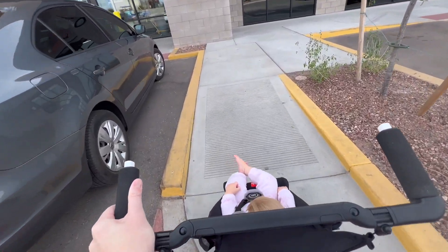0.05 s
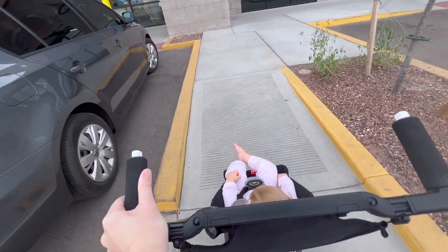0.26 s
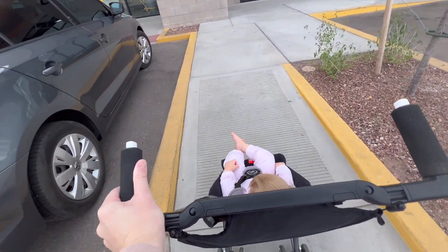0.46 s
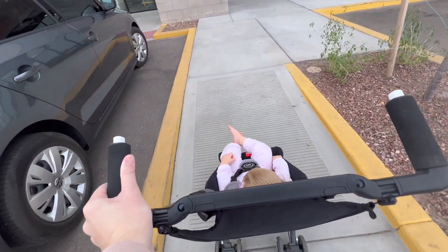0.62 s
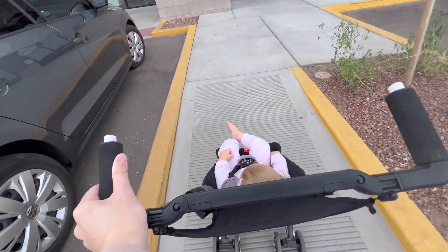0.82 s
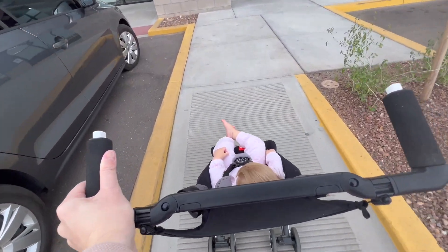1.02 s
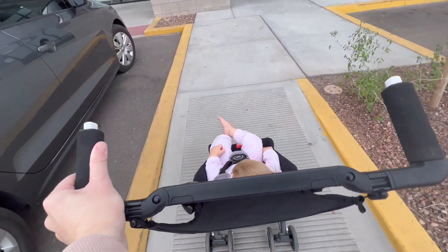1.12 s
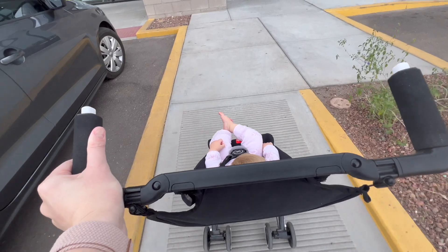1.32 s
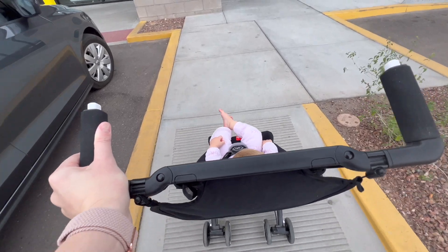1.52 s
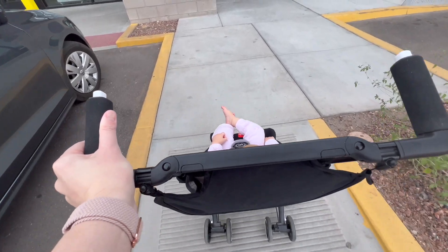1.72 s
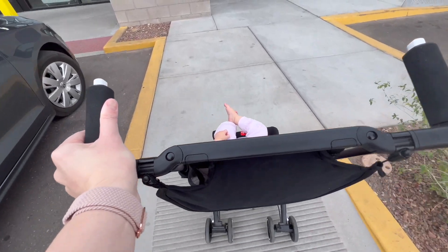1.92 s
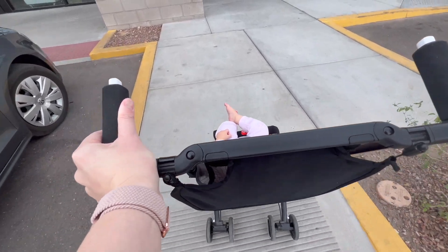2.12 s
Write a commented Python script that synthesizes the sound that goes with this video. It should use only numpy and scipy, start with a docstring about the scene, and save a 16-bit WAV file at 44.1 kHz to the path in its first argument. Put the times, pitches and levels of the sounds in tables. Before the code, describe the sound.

Hard stroller wheels roll onto a grooved concrete ramp, crunching, clicking and rattling outdoors.

```python
"""Stroller on a grooved curb ramp

Outdoors, heard from the handle: hard wheels crunch over grit and tick across concrete grooves.
Coloured noise and random impacts make the rolling, scuffs and frame drone; decaying sines make
the thumps, frame clacks, fitting rattle and loose-wheel chatter. A low noise rumble, probably air
buffeting the microphone ports, falls away from about 1.3 s and swells again at the end.
Distant traffic is a steady noise wash."""
import sys
import numpy as np
from scipy.fft import rfft, irfft, next_fast_len
from scipy.io import wavfile
from scipy.ndimage import uniform_filter1d, map_coordinates

SR = 44100
rng = np.random.default_rng(int(sys.argv[2]) if len(sys.argv) > 2 else 0)


def store_wav(level_fs):
    """Save 16-bit WAV to argv[1]."""
    pcm = np.round(np.clip(np.atleast_2d(level_fs), -1, 1) * 32767)
    wavfile.write(sys.argv[1], SR, pcm.T.astype(np.int16))


N = 95079

# Rolling crunch. Each row: time in seconds, level in dB before the groove pulse.
CRUNCH_LEVEL = [(0, -53), (.17, -49.5), (.24, -44.5), (.3, -57), (.4, -43.5), (.55, -44.5), (.68, -38),
                (.73, -45.5), (.8, -39), (1.48, -38.5), (1.7, -34), (1.8, -36), (1.91, -40.5), (1.99, -35),
                (2.16, -43)]
# Fine sand under the tyres. Each row: time in seconds, level in dB before flicker and groove pulse.
SAND_LEVEL = [(0, -53.5), (.22, -51.5), (.3, -62), (.74, -84), (.8, -52.5), (1.3, -53.5), (1.42, -43),
              (1.62, -42), (1.8, -49), (1.9, -52.5), (2.16, -47.5)]
# Buffeting. Each row: time in seconds, level in dB.
BUFFET_LEVEL = [(0, -32.5), (.09, -26.5), (.15, -32.5), (.85, -30.5), (1.05, -29), (1.28, -29), (1.33, -29),
                (1.49, -40), (1.9, -54.5), (2.16, -41)]
# Noise spectra. Each row: frequency in Hz, relative density in dB per Hz.
BUFFET_COLOUR = [(15, -53), (45, -6), (70, 0.5), (90, -4), (140, -9.5), (400, -34), (900, -94)]
FRAME_COLOUR = [(40, -9.5), (90, 2.5), (260, -0.5), (370, -5), (500, -9.5), (4500, -51)]
CRUNCH_COLOUR = [(200, -13), (700, -2), (2000, -3), (4200, -6.5), (6500, -14.5), (9000, -16), (16000, -119)]
SAND_COLOUR = [(1000, -8), (4000, -0.5), (7000, -7), (9000, 3), (10500, -9), (15500, -3)]
KNOCK_COLOUR = [(150, -4), (700, -2), (3500, 1), (9000, -6), (16000, -16.5)]
# Far traffic around the car park. Each row: frequency in Hz, relative density in dB per Hz.
TRAFFIC_COLOUR = [(550, -11.5), (950, 11.5), (2000, -25), (12000, -48)]
# Grit's drive of the wheel resonances. Each row: frequency in Hz, drive in dB.
GRIT_DRIVE = [(2500, 6.5), (3600, -19), (5500, 2)]
# Wheel and fork, frame joint, loose wheel and small fitting resonances.
# Each row: nominal frequency in Hz, relative level in dB, 60 dB decay time in seconds.
WHEEL_MODES = [(963, -8, 0.017), (1430, -7, .017), (1974, -9, 0.025), (2500, 1, 0.014), (3300, 1, .011),
               (3760, 5, 0.012), (5550, -9, 0.029), (8300, -7, 0.017)]
JOINT_MODES = [(1830, -8, 0.055), (2900, -1, 0.018), (4080, 7, 0.017), (4720, 1, 0.022)]
LOOSE_MODES = [(1310, -17, 0.01), (2440, -3, 0.014)]
FITTING_MODES = [(2260, 2.5, 0.029), (5370, -2, 0.026)]
# Wheel drops into a groove. Each row: start in seconds, level in dB before the group gain,
# brightness in dB per octave.
GROOVES = [(.655, -30, -8.5), (.8572, -26.5, -1), (.9082, -30.5, 11), (.9287, -30, -5.5), (.9994, -26, -2),
           (1.0236, -24, -1), (1.1128, -28, -6), (1.1346, -26.5, -8), (1.1571, -28.5, -6.5),
           (1.1775, -29, -6.5), (1.199, -27.5, -8), (1.2615, -29, -3), (1.2824, -22.5, 0),
           (1.3038, -24.5, -3), (1.346, -30, -4), (1.3882, -28, -2), (1.4093, -24.5, -0.5),
           (1.5134, -30, -3), (1.598, -30.5, -4), (1.6835, -27.5, 0), (1.704, -27.5, 0), (1.944, -30, -4),
           (1.975, -29, 1), (2.0097, -27, -4)]
# Small fitting rattles. Each row: start in seconds, level in dB before the group gain.
RATTLES = [(.3255, -36.5), (.4177, -38.5), (.4681, -50), (.491, -31.5), (.516, -42), (.5623, -45),
           (.6072, -41)]
# Frame joint clacks. Each row: start in seconds, level in dB before the group gain,
# brightness in dB per octave, pitch ratio.
CLACKS = [(.1003, -22, -2.5, 1), (.197, -32, -4.5, 1), (.216, -34, -4, .85), (1.2402, -20.5, -2.5, .81)]
# Loose wheel chatters. Each row: start in seconds, level in dB before the group gain.
CHATTER = [(1.719, -28), (1.7698, -23.5), (1.7903, -21), (1.8135, -21.5), (1.8645, -26.5)]
# Tyre scuffs. Each row: start in seconds, length before release in seconds, level in dB,
# left minus right in dB.
SCUFFS = [(0.029, 0.05, -39.5, 2), (0.186, 0.009, -36.5, -5), (0.627, 0.033, -38.5, 0)]
# Frame thumps on a bump. Each row: start in seconds, level in dB before the envelope, pitch in Hz.
THUMPS = [(0.073, -15, 66), (.296, -19.5, 118.6), (0.954, -24, 106), (1.26, -17.5, 88),
          (1.439, -25.5, 143.6)]
# Microphone pair. Each row: frequency in Hz, left minus right in dB.
PORT_BALANCE = [(60, 3), (400, -2), (750, 4.5), (2000, -2), (2700, 3), (3500, 5), (4100, 1), (5500, 9),
                (7200, 3.5), (8800, -1.5)]

SIDES = np.array([[.5], [-.5]])  # half of a left-right difference goes to each port
LEFT_LEAD_S, TOP_HZ = 0.000532, 16100
ALIKE = .4  # power share common to both ports
GRIT_PER_S, GRIT_SHARE = 920, 0.29  # impact rate; power share of impacts
GRIT_SPREAD_DB = 3.8  # scales the exponential draw of impact size
GROOVE_HZ = 43.65  # nominal grooves per second
SURGE_DB, SURGE_SCATTER_DB, SURGE_DECAY_S = -1, 3.5, 0.0055  # groove burst over a base gain of 1
RING_DB = -4.5  # wheel ring relative to crunch
PATCH_HZ, PATCH_DB = 22, 1.6
SAND_FLICKER_HZ, SAND_FLICKER_DB = 60, 2.4
FRAME_DB, TRAFFIC_DB = -41.5, -56
SCUFF_ATTACK_S, SCUFF_RELEASE_S = 0.0042, 0.0084
THUMP_ATTACK_S, THUMP_T60_S = 0.0025, 0.14
MODE_SCATTER_DB, MODE_DETUNE = 2.5, .018  # detune is in log frequency


def amp(db):
    """Decibels to gain."""
    return 10 ** (np.asarray(db) / 20)


def unit(x):
    """Scale to rms 1."""
    return x / np.sqrt(np.mean(x ** 2) + 1e-20)


def curve(rows):
    """Interpolate (s, value) points to one value per sample."""
    return np.interp(np.arange(N) / SR, *np.transpose(rows))


def colour(points):
    """Gain as a function of frequency from (Hz, dB) points, on a log frequency axis."""
    point_hz, point_db = np.transpose(points)
    return lambda hz: amp(np.interp(np.log(hz + 1), np.log(point_hz + 1), point_db))


def filtered(x, response):
    """Apply a frequency response, zero-padded against wraparound."""
    n = x.shape[-1]
    size = next_fast_len(n + min(n, 8192))
    spectrum = rfft(x, size) * response(np.fft.rfftfreq(size, 1 / SR))
    return irfft(spectrum, size)[..., :n]


def wobble(rate_hz):
    """Smooth random curve with rate_hz knots per second."""
    knots = rng.standard_normal(int(N * rate_hz / SR) + 4)
    return map_coordinates(knots, [np.arange(N) * rate_hz / SR])


def pair(three, alike):
    """Mix one shared and two separate signals to left and right."""
    share = np.clip(alike, 0, 1)
    return np.sqrt(share) * three[0] + np.sqrt(1 - share) * three[1:]


def rush(points, alike, size=N):
    """Coloured stereo noise of rms 1."""
    noise = pair(rng.standard_normal((3, size)), alike)
    return unit(filtered(noise, colour(points)))


def add(out, start_s, sound):
    """Mix a sound in at start_s."""
    part = out[:, max(round(start_s * SR), 0):][:, :sound.shape[1]]
    part += sound[:, :part.shape[1]]


def patches():
    """Gain that makes a sound uneven, wandering smoothly in dB."""
    return amp(PATCH_DB * wobble(PATCH_HZ))


def grit():
    """Tiny impacts of random size and sign on a bed of friction noise."""
    sizes = amp(GRIT_SPREAD_DB * np.minimum(rng.exponential(size=(3, N)), 3))
    struck = rng.random((3, N)) < GRIT_PER_S / SR
    impacts = unit(struck * sizes * rng.choice([-1, 1], (3, N)))
    friction = rng.standard_normal((3, N))
    return pair(np.sqrt(GRIT_SHARE) * impacts + np.sqrt(1 - GRIT_SHARE) * friction, ALIKE)


def groove_pulse():
    """Gain of rms 1 that jumps by a random amount at each passing groove and falls back."""
    passed = np.cumsum(GROOVE_HZ * np.exp(.12 * wobble(22))) / SR
    scatter_db = SURGE_SCATTER_DB * rng.uniform(-1, 1, int(passed[-1]) + 1)
    strength = amp(SURGE_DB + scatter_db)
    since_groove_s = (passed % 1) / GROOVE_HZ  # at the nominal rate
    return unit(1 + strength[passed.astype(int)] * np.exp(-since_groove_s / SURGE_DECAY_S))


def wheel_response(f):
    """Parallel wheel and fork resonances, each with bandwidth set by its decay time."""
    total = 0
    for hz, db, t60_s in WHEEL_MODES:
        damping = 1j * f * np.log(1000) / np.pi / t60_s
        total = total + amp(db) * damping / (hz * hz - f * f + damping)
    return total


def rolling():
    """Grit crunches under the tyres and rings the wheels, unevenly, pulsing with the grooves."""
    crunch = unit(patches() * filtered(grit(), colour(CRUNCH_COLOUR)))
    drive = colour(GRIT_DRIVE)
    ring = unit(patches() * filtered(grit(), lambda f: wheel_response(f) * drive(f)))
    flicker = amp(SAND_FLICKER_DB * wobble(SAND_FLICKER_HZ))
    sand = unit(filtered(grit(), colour(SAND_COLOUR))) * flicker
    body = amp(curve(CRUNCH_LEVEL)) * unit(crunch + amp(RING_DB) * ring)
    return groove_pulse() * (body + amp(curve(SAND_LEVEL)) * sand)


def frame_drone():
    """The frame drones dully: low coloured noise in uneven lumps."""
    return amp(FRAME_DB) * unit(patches() * rush(FRAME_COLOUR, alike=0.55))


def buffeting():
    """Low flutter, partly different at each port, its short-term level evened out."""
    air = rush(BUFFET_COLOUR, alike=0.46)
    swell = np.sqrt(np.abs(uniform_filter1d(air ** 2, size=SR // 16, axis=1)) + 1e-6)
    return amp(curve(BUFFET_LEVEL)) * air / swell


def traffic():
    """Steady, diffuse wash of distant tyres: noise independent at each port."""
    return amp(TRAFFIC_DB) * rush(TRAFFIC_COLOUR, alike=0)


def scuffs():
    """A tyre skids briefly over sandy concrete: gated, coloured grit."""
    gain, t = np.zeros((2, N)), np.arange(N) / SR
    for start_s, length_s, db, pan_db in SCUFFS:
        attack = np.clip((t - start_s) / SCUFF_ATTACK_S, 0, 1)
        release = np.exp(-np.maximum(t - start_s - length_s, 0) / SCUFF_RELEASE_S)
        gain += attack * release * amp(db + pan_db * SIDES)
    return gain * unit(filtered(grit(), colour(KNOCK_COLOUR)))


def thumps():
    """The frame bounces on a bump: a low decaying sine, its phase differing between ports."""
    out, t = np.zeros((2, N)), np.arange(SR // 4) / SR
    for start_s, db, hz in THUMPS:
        phase = rng.uniform(0, 2 * np.pi) + rng.standard_normal((2, 1))
        envelope = amp(db - 60 * t / THUMP_T60_S) * (1 - np.exp(-t / THUMP_ATTACK_S))
        add(out, start_s, envelope * np.sin(2 * np.pi * hz * t + phase))
    return out


def knocks(events, modes, gain_db, crack_db, crack_t60_s, rebound_s, rebound_db):
    """Each contact rings the modes with a short noise crack, then rebounds once."""
    out, t = np.zeros((2, N)), np.arange(SR // 16) / SR
    hz, level_db, t60_s = np.transpose(modes)[:, :, None]

    def blow(bright_db_per_octave=0, pitch=1):
        """One contact of rms 1, its modes scattered in level, tuning and phase."""
        scatter_db = MODE_SCATTER_DB * rng.standard_normal((2, *hz.shape))
        gains = amp(level_db + scatter_db - 60 * t / t60_s)
        phase = 2 * np.pi * rng.random(gains[..., :1].shape)
        mode_hz = pitch * hz * np.exp(MODE_DETUNE * rng.standard_normal(hz.shape))
        ring = (gains * np.sin(2 * np.pi * mode_hz * t + phase)).sum(1)
        crack = rush(KNOCK_COLOUR, ALIKE, size=len(t)) * amp(-60 * t / crack_t60_s)
        onset = 1 - np.exp(-t / 0.000094)
        hit = (unit(ring) + amp(crack_db) * unit(crack)) * onset

        def tilt(f):
            return amp(bright_db_per_octave * np.log2(np.clip(f, 700, 6000) / 3000))

        return unit(filtered(hit, tilt))

    for start_s, db, *tone in events:
        add(out, start_s, amp(db + gain_db) * blow(*tone))
        add(out, start_s + rebound_s, amp(db + gain_db + rebound_db) * blow(*tone))
    return out


def clacks():
    """A frame joint clacks: ringing modes with a strong crack."""
    return knocks(CLACKS, JOINT_MODES, gain_db=-15, crack_db=-.5, crack_t60_s=0.038,
                  rebound_s=.0044, rebound_db=-11)


def rattle():
    """A small fitting rattles on the first grooves: two ringing modes and a crack."""
    return knocks(RATTLES, FITTING_MODES, gain_db=-15, crack_db=-2, crack_t60_s=0.02,
                  rebound_s=.003, rebound_db=-8)


def groove_drops():
    """A wheel drops into a groove and rings briefly."""
    return knocks(GROOVES, WHEEL_MODES, gain_db=-16, crack_db=-4.5, crack_t60_s=.018,
                  rebound_s=0.0034, rebound_db=-14.5)


def chatter():
    """The loose wheel chatters: short modes, little crack, a strong rebound."""
    return knocks(CHATTER, LOOSE_MODES, gain_db=-17, crack_db=-15.5, crack_t60_s=0.014,
                  rebound_s=.0045, rebound_db=-3)


def scene():
    """Rolling, scuffs and knocks reach the left port slightly first; the rest is added unshifted."""
    contacts = rolling() + scuffs() + clacks() + rattle() + groove_drops() + chatter()
    contacts = filtered(contacts, lambda f: np.exp(2j * np.pi * f * LEFT_LEAD_S * SIDES))
    return contacts + frame_drone() + buffeting() + traffic() + thumps()


def record(dry):
    """Each port has its own colour; nothing is kept above the band limit."""
    balance = colour(PORT_BALANCE)
    return filtered(dry, lambda f: balance(f) ** SIDES * (f < TOP_HZ))


dry = scene()
out = record(dry)
store_wav(out)
```